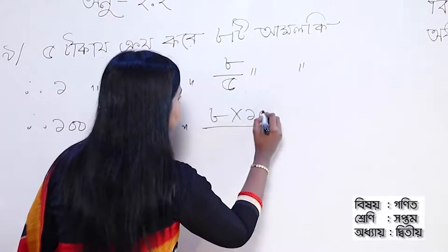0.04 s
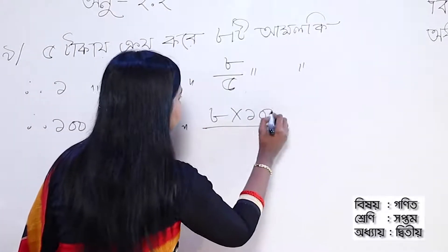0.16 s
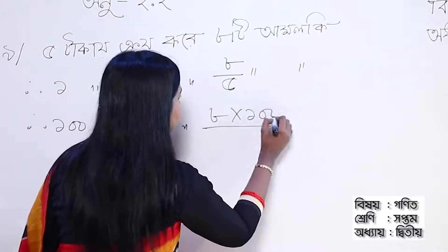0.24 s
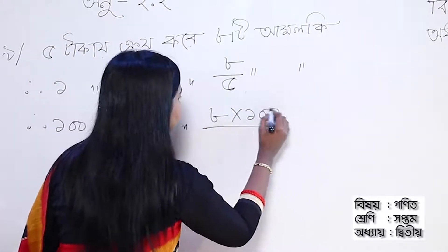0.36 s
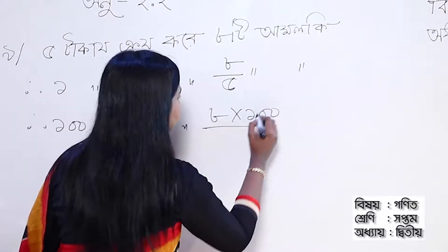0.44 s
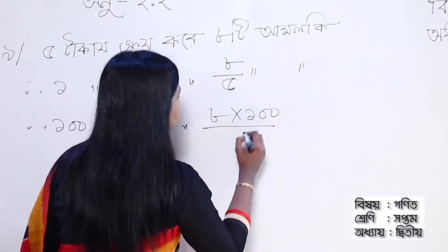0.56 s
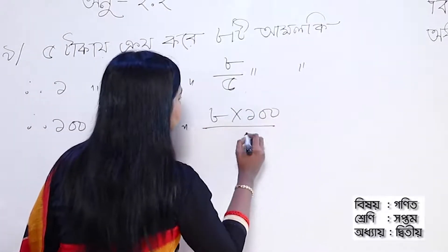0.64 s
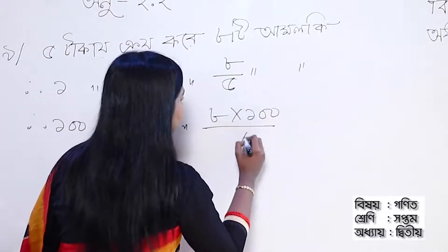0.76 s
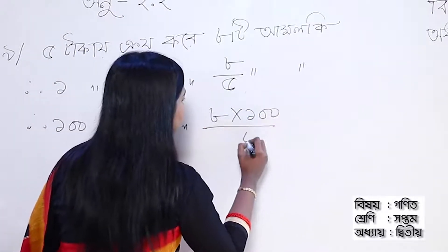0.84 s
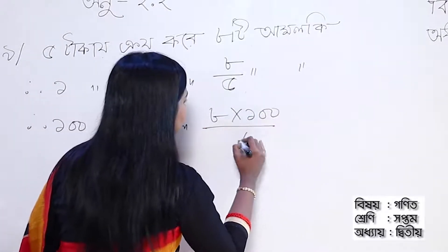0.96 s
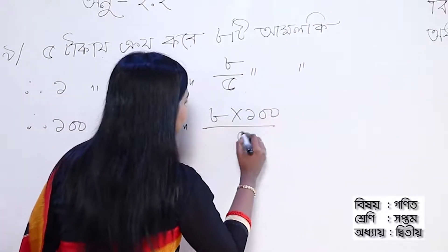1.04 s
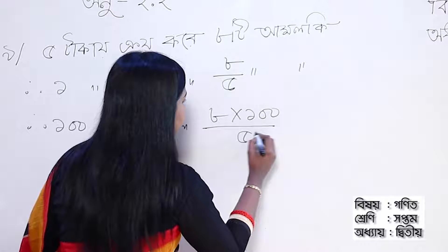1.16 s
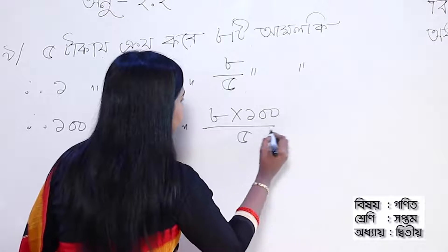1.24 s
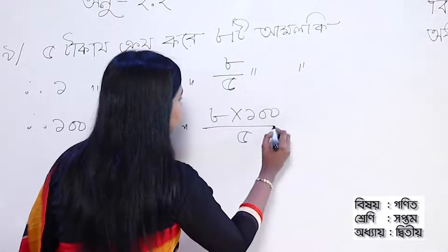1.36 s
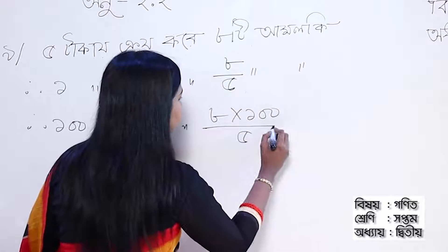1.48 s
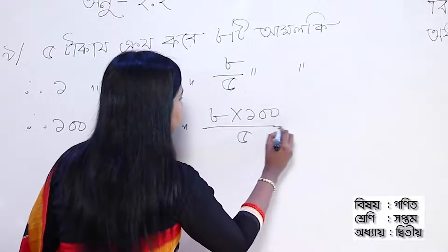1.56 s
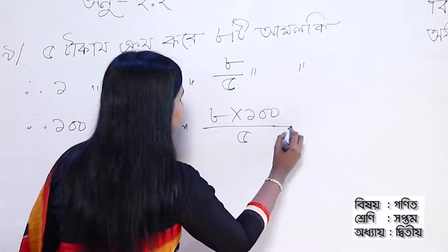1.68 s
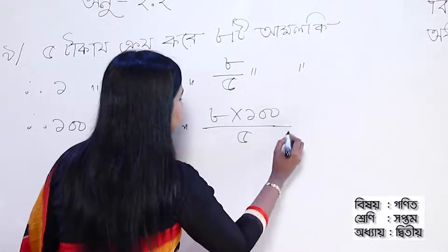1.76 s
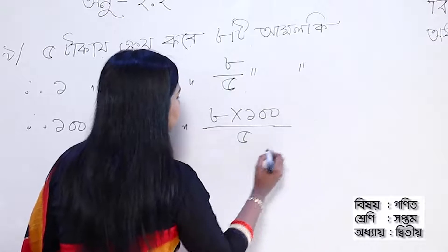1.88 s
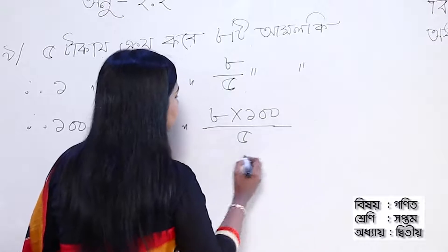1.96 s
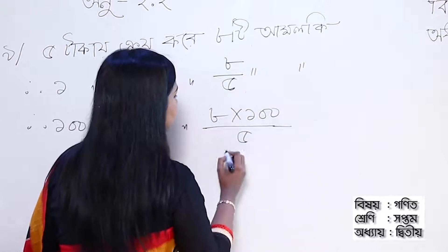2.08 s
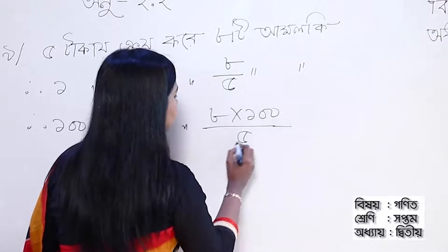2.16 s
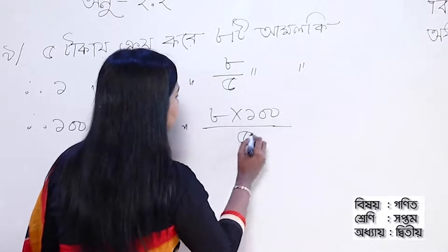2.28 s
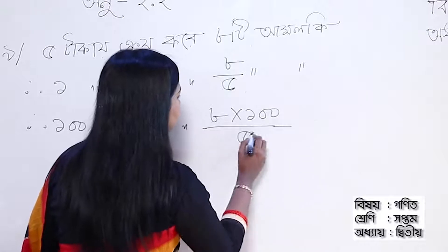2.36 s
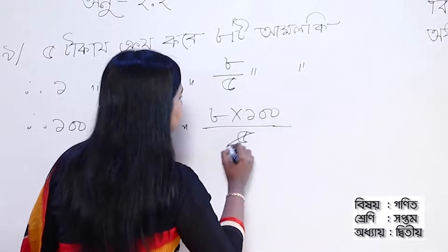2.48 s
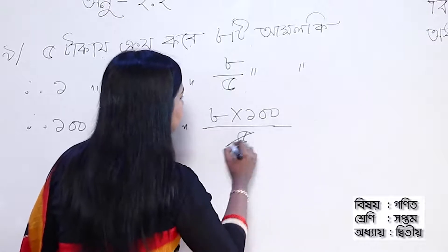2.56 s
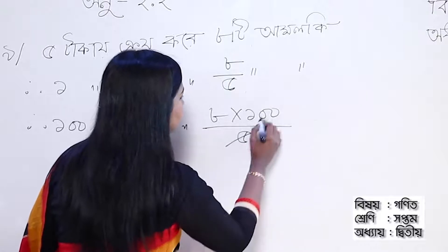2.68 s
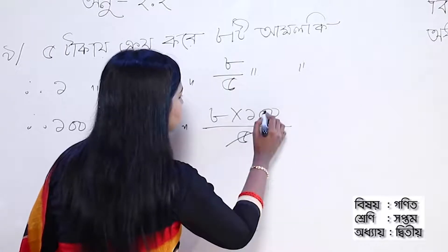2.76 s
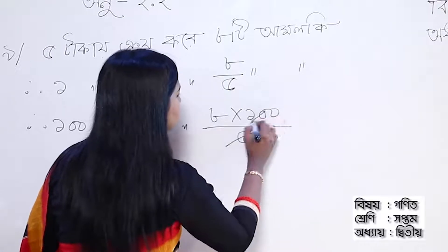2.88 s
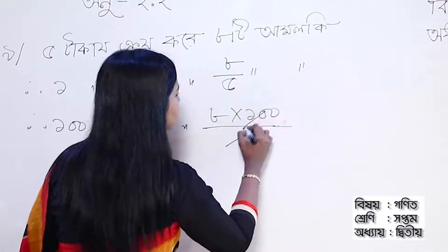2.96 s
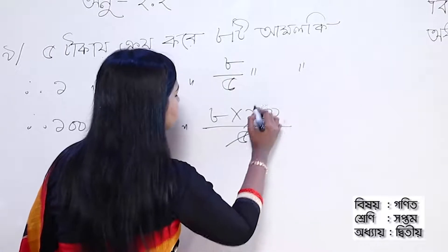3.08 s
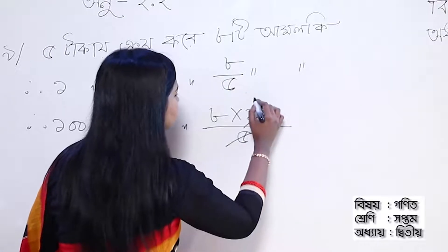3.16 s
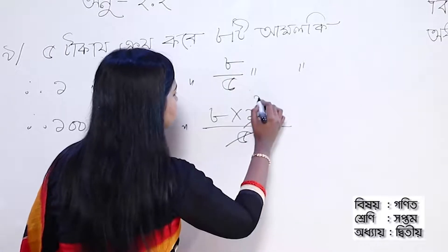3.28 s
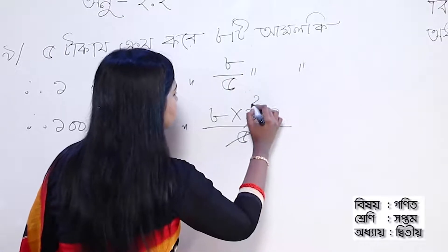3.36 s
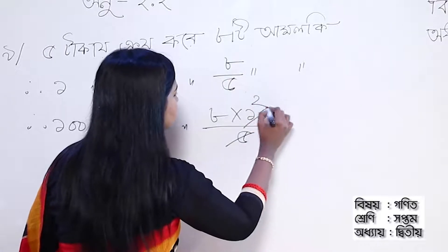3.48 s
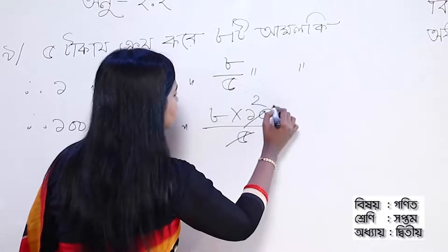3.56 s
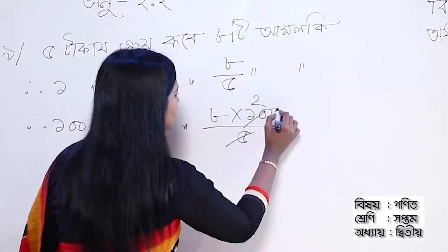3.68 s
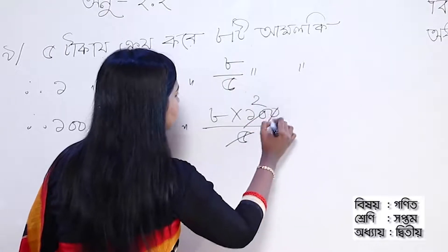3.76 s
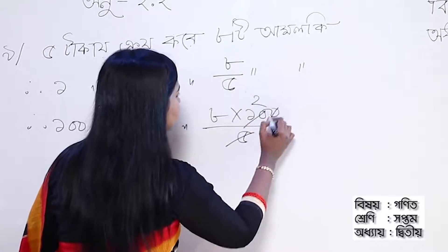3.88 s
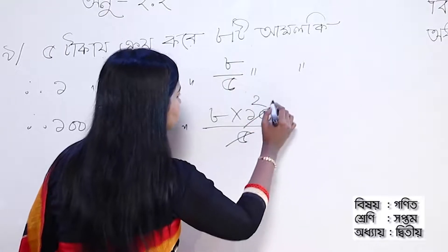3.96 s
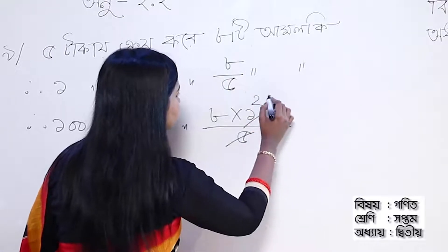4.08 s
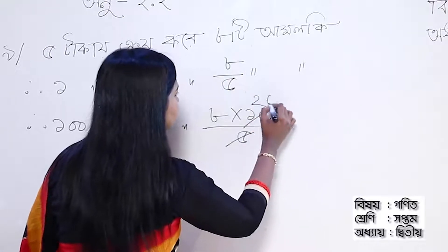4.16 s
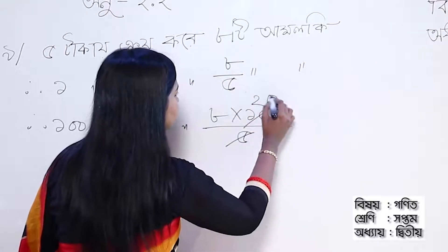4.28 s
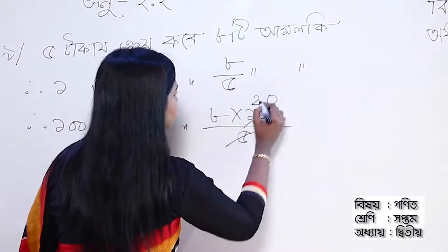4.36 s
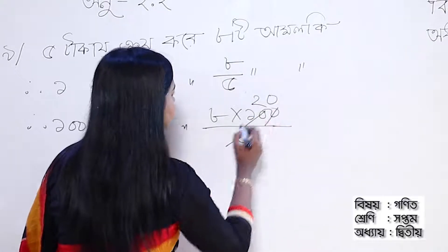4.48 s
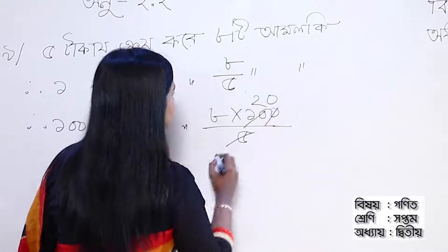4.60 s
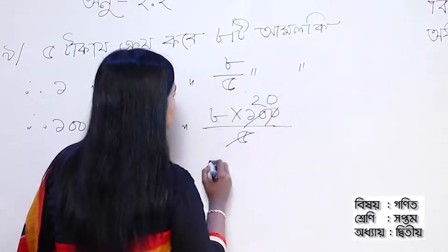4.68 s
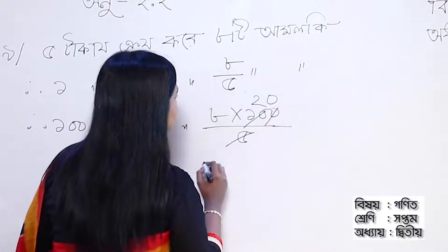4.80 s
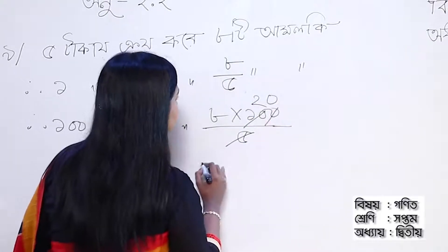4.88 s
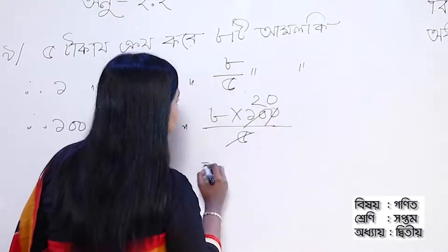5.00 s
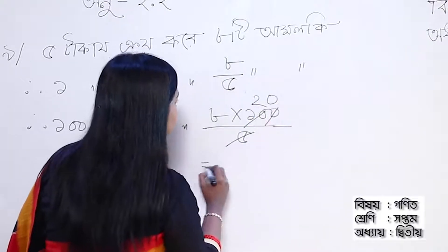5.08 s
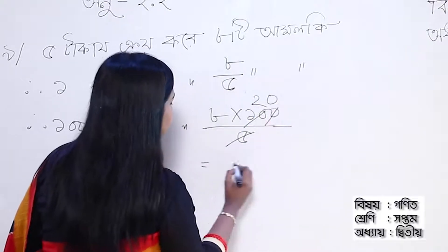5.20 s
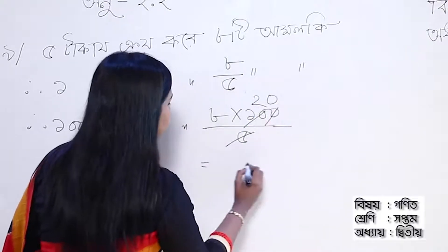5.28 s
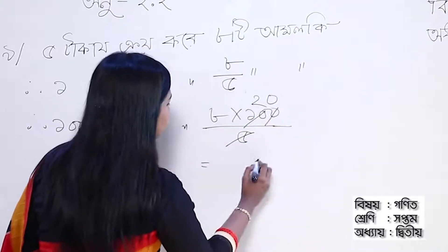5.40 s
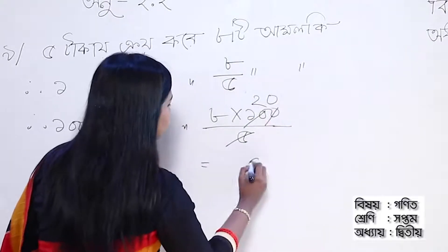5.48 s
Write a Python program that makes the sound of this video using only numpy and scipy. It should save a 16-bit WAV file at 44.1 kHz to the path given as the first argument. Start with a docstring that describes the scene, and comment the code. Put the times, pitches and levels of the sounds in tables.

```python
"""A treble hiss already under way: a felt marker in mid-stroke on a wall-mounted whiteboard still ringing.
Strokes are gritty noise through nib and board resonances; each landing thumps the board like a dull drum
by a falling, fast-dying wave, a click and ringing modes. Cloth noise is the writer's sleeve; short cycles
and snaps are dry ticks. Quiet classroom, near mono microphone, room rumble, microphone hiss, two whines."""
import sys
import numpy as np
from scipy import signal
from scipy.io import wavfile
from scipy.ndimage import uniform_filter1d

SR = 44100
rng = np.random.default_rng(int(sys.argv[2]) if len(sys.argv) > 2 else 0)


def inscribe(sig):
    """Save sig as 16-bit PCM at rate SR to the path in sys.argv[1].

    A 1-D sig is mono; a 2-D sig holds one channel per row.
    Samples are clipped to [-1, 1] before scaling.
    """
    pcm = np.round(np.clip(np.atleast_2d(sig).T, -1, 1) * 32767)
    wavfile.write(sys.argv[1], SR, pcm.astype(np.int16))


def ratio(d):
    """dB to gain"""
    e = np.asarray(d, float) / 20
    return 10 ** e


N = 244089
LEAD = SR // 20  # samples rendered ahead, so that an earlier blow still rings

# pulls of the nib: start t/s, length/s, share of length at which speed tops, scrape level/dB,
# lift of the nib's lowest ring/dB, lift of the airy top/dB
STROKES = [(-.04, 0.23, 0.67, -49, 2, -2), (0.153, 0.38, 0.17, -50.5, 2, -5),
           (.355, 0.14, .4, -44.5, .1, -2), (0.778, 0.045, .25, -61, .1, -1), (.855, 0.14, 0.53, -52, 3, 1),
           (1.01, 0.26, 0.18, -46.5, 5.5, -1), (1.15, 0.1, 0.63, -58, 9, .1), (1.639, .14, 0.67, -47, 4, 3),
           (2.465, .19, .6, -52, 7, 5), (2.677, 0.021, .4, -49, -1, -4),
           (2.862, 0.029, 0.51, -52, 4.5, -15), (2.921, .18, 0.7, -53, 7, 1),
           (3.296, 0.036, .3, -56.5, 5, -3), (3.335, 0.097, 0.72, -56.5, 5, -6),
           (3.419, 0.082, .7, -54.5, 10, -12), (3.517, 0.094, 0.46, -48, 7, 1), (3.786, .16, 1, -50, 2, 3),
           (4.155, .035, .35, -53.5, .1, -13), (4.222, 0.2, 0.73, -47, 5, 0), (5.003, 0.074, .7, -54, 5, 7),
           (5.163, 0.065, 0.65, -56, 6, 4)]
# broad nib resonances: f/Hz, width/Hz, relative level/dB
NIB_MODES = [(6660, 1230, -3), (8000, 1240, 1.5), (9200, 1740, 6), (10460, 2100, 6.5), (12050, 1900, 2),
             (14300, 2400, -3.5)]
# broad board resonances under the scrape: f/Hz, width/Hz, relative level/dB
BUZZ_MODES = [(890, 550, 0.5), (1780, 380, 1), (2870, 660, -1.5), (4350, 660, -8)]
# landings on the board: t/s, blow level before the felt low-pass/dB, nominal thump f/Hz,
# hard-tip click level relative to the thump/dB
TAPS = [(-.021, -18.5, 258, -24), (0.76, -23, 223, -13), (0.783, -11, 259, -53), (1.592, -15.5, 267, -27.5),
        (2.1076, -32, 250, -13.5), (2.2185, -32.5, 250, -19), (2.2283, -32, 251, -17),
        (2.4381, -13.5, 246, -35), (2.867, -15.5, 277, -27), (3.304, -7, 305, -23),
        (3.7725, -8.5, 283, -23.5), (4.163, -9.5, 281, -25), (4.682, -32.5, 285, -29),
        (4.889, -28, 227, -15), (4.9633, -12, 232, -37), (5.1687, -5.5, 259, -28.5),
        (5.427, -33.5, 204, -8), (5.5244, -16.5, 244, -24)]
# rings of the hard tip: f/Hz, relative level/dB, t60/s
TIP_MODES = [(416.6, 9, 0.042), (592, -2, 0.078), (1020, 3.5, 0.02), (1120, -23, 0.025), (1685, -7, .015)]
# board modes after a blow: f/Hz, relative level/dB, t60/s, gain on the stiffer, higher-pitched part/dB
BOARD_MODES = [(34.6, -5, 1, 6), (64, -19, 0.23, -13), (110.5, -1, 0.47, 11), (147.4, -1, 0.67, 8),
               (192.7, -3.5, 0.45, -4), (243.8, -4, 0.22, 10), (297, 2, 0.53, 0.5), (379, -11, 0.78, 0),
               (380, -34, 0.43, -37), (461.4, -10.5, 0.12, 25), (590, -8, 0.22, 8)]
# arm movements: start t/s, length/s, share of length at which speed tops, 1.5-6.5 kHz level/dB
ARM_MOVES = [(-.02, .3, 0.32, -58.5), (.33, 0.16, 0.81, -59.5), (.59, 0.19, 0.47, -60),
             (1.37, 0.072, 0.46, -59.5), (1.93, 0.5, 0.26, -56.5), (2.71, 0.22, 0.58, -57),
             (3.1, 0.3, 0.42, -58), (4.01, 0.22, 0.45, -57.5), (4.44, 0.55, 0.4, -53.5),
             (5.23, 0.46, 0.17, -61)]
# broad cloth resonances: f/Hz, width/Hz, relative level/dB
CLOTH_MODES = [(310, 240, 19.5), (880, 1000, 8), (3010, 2600, 4.5), (5720, 1450, 3.5), (10700, 7000, -2.5)]
# rumble and hiss spectrum: f/Hz, relative level per Hz/dB
FLOOR_SPECTRUM = [(15, -53), (25, -12.5), (64, 4), (96, 2.5), (276, -9.5), (637, -21), (905, -21.5),
                  (2150, -27.5), (3680, -29.5), (3990, -31), (4950, -31.5), (10500, -31), (15800, -33)]
# steady electrical tones: f/Hz, rms level/dB
WHINES = [(3908, -75), (4710, -80.5)]
# nib catches or lifts: t/s, tone level/dB, f/Hz, wide-band snap peak level/dB
TICKS = [(0.761, -50, 10200, -35), (0.869, -45, 895, -41), (.874, -45, 1710, -55), (0.947, -38, 9320, -44),
         (1.122, -45, 8000, -30), (1.177, -47, 11300, -30), (1.8225, -48, 9050, -45),
         (2.04, -50, 4480, -50), (2.1074, -58, 3480, -46), (2.2195, -39.5, 800, -46),
         (2.39, -50, 3940, -48), (2.4383, -45, 9300, -38), (2.6818, -50, 3220, -40),
         (2.8383, -44, 1810, -44), (3.1737, -53, 10800, -50), (3.772, -55, 8950, -40),
         (3.9769, -45, 11800, -29.5), (4.59, -49, 2850, -50), (4.684, -44, 3020, -53),
         (4.8895, -37.5, 780, -42), (5.3266, -50, 6260, -46)]
# wall and floor echoes: delay/s, gain before the low-pass
ECHOES = [(.0118, .14), (.0172, -.12), (.0261, -.24), (.0337, -.2), (.0493, .1), (.0568, .12), (.0653, .1),
          (.0733, .08)]
# diffuse tail: f/Hz, t60/s
TAIL_T60 = [(60, 1), (160, 1), (420, 0.54), (1100, 0.1), (8000, 0.17)]
# spectrum of the faint noise that differs between channels: f/Hz, relative level per Hz/dB
APART_SPECTRUM = [(30, -30), (150, -9), (300, -7), (600, -4.5), (2000, -5), (8000, -5.5), (11500, -9.5),
                  (13000, -15)]

SCRAPE_POWER, BUZZ_POWER, RUSTLE_POWER = 0.91, 1.3, 1.07  # amplitude grows as speed to this power
SCRAPE_ROUND, RUSTLE_ROUND = 1, 0.083  # 1 = round arch of speed, 0 = pointed peak
BUZZ_DB = -10.5  # relative to the scrape
LOW_DRIFT_DB, TOP_DRIFT_DB = 4, -3  # start to end of a pull: it darkens
THUMP_DECAY_CYCLES, FELT_HZ = 0.38, 1700  # decay constant; the felt cushions the blow above FELT_HZ
FLOOR_RMS_DB, APART_RMS_DB, TAIL_DB = -46, -75.5, -24
TICK_PEAK_S, TICK_SHORTER = 0.00079, 0.48  # peak time at 3 kHz; shortens with pitch to this power
EDGE_HZ = 15860


def evened(x):
    """Scales to rms 1."""
    return x / np.sqrt(np.mean(x ** 2) + 1e-20)


def read(points, hz):
    """Reads a curve on a log-frequency axis."""
    f, value = np.transpose(points)
    return np.interp(np.log(hz + 1), np.log(f + 1), value)


def add(mix, at_s, sound):
    """Adds a sound at a time."""
    part = mix[max(round(at_s * SR), 0):][:len(sound)]
    part += sound[:len(part)]


def humps(modes, hz):
    """Magnitude of broad resonances, added in energy."""
    power = sum(ratio(db) ** 2 / (1 + ((hz - f) / (width / 2)) ** 2) ** 2 for f, width, db in modes)
    return np.sqrt(power)


def rings(modes, t):
    """Sum of exponentially dying sines."""
    return sum(ratio(db - 60 * t / t60) * np.sin(2 * np.pi * hz * t) for hz, db, t60 in modes)


def gritty(grains_per_s, spread_db):
    """Slips of uneven size over smooth noise."""
    size = ratio(spread_db * np.minimum(rng.exponential(1, N), 4))
    size = size * (rng.random(N) < grains_per_s / SR)
    return evened(size * rng.standard_normal(N)) + rng.standard_normal(N)


def shaped(x, magnitude, patchy_db, size, bins, frames):
    """Filters x by magnitude(Hz, s) and by random streaks, bins high and frames long."""
    hz, t, z = signal.stft(x, SR, nperseg=size, noverlap=size * 3 // 4)
    patches = rng.standard_normal(z.T.shape).T
    patches = uniform_filter1d(patches, round(bins), 0)
    patches = evened(uniform_filter1d(patches, round(frames), 1))
    z = z * magnitude(hz[:, None], t) * ratio(patchy_db * patches)
    return signal.istft(z, SR, nperseg=size, noverlap=size * 3 // 4)[1][:N]


def moves(rows, t, power, rounded):
    """Progress 0-1 and gain of each movement: speed swells to its top and falls again."""
    start, length, share, db = np.transpose(rows)[:4, :, None]
    done = np.clip((t - start) / length, 0, 1)
    share = np.clip(share, .05, .95)
    ramp = np.minimum(done / share, (1 - done) / (1 - share))
    speed = ramp * (1 + np.clip(rounded, 0, 1) * (1 - ramp))
    return done, ratio(db) * speed ** power


def movement_gain(rows, power, rounded):
    """Gain of overlapping movements, added in energy."""
    return np.linalg.norm(moves(rows, np.arange(N) / SR, power, rounded)[1], axis=0)


def lift_db(t, drift_db, column):
    """Colour of the pull that sounds at t, drifting along it; overlaps weighted by energy."""
    done, gain = moves(STROKES, t, SCRAPE_POWER, SCRAPE_ROUND)
    db = np.transpose(STROKES)[column][:, None] + drift_db * (done - .5)
    return (gain ** 2 * db).sum(0) / ((gain ** 2).sum(0) + 1e-20)


def strokes():
    """Felt fibres slip over the glaze: they ring the nib, tilted by pressure and speed, and buzz the board."""
    judder = uniform_filter1d(rng.standard_normal(N), size=400)
    judder = evened(uniform_filter1d(judder, size=200))  # the grip wavers
    slips = gritty(grains_per_s=5500, spread_db=4.5) * ratio(1.3 * judder)

    def nib(hz, t):
        low = lift_db(t, LOW_DRIFT_DB, column=4) * np.clip((8500 - hz) / 1500, 0, 1)
        top = lift_db(t, TOP_DRIFT_DB, column=5) * np.clip((hz - 11000) / 2000, 0, 1)
        return humps(NIB_MODES, hz) * ratio(low + top)

    scrape = shaped(slips, nib, patchy_db=3.2, size=256, bins=3, frames=30)
    buzz = shaped(slips, lambda hz, t: humps(BUZZ_MODES, hz), patchy_db=3.0, size=256, bins=2, frames=20)
    scrape = movement_gain(STROKES, SCRAPE_POWER, SCRAPE_ROUND) * evened(scrape)
    buzz = movement_gain(STROKES, BUZZ_POWER, SCRAPE_ROUND) * evened(buzz)
    return scrape + ratio(BUZZ_DB) * buzz


def taps():
    """A soft nib drives a swelling, fast-dying bending wave that falls in pitch, a click, then board modes."""
    t, ring_t = np.arange(SR // 12) / SR, np.arange(SR * 3 // 5) / SR
    out = np.zeros(N + LEAD)
    click = rings(TIP_MODES, t) * (1 - np.exp(-t / 0.00062)) ** 2
    bank = np.array([rings([mode[:3]], ring_t) for mode in BOARD_MODES])
    bank = bank * ratio(-59.5) * (1 - np.exp(-ring_t / 0.021))
    stiff_gain_db = np.transpose(BOARD_MODES)[3]
    felt = signal.butter(2, FELT_HZ, fs=SR)
    for s, db, hz, click_db in TAPS:
        cycles = hz * t
        swell = cycles ** 1.95 * np.exp(-cycles / THUMP_DECAY_CYCLES)
        thump = -swell * np.sin(2 * np.pi * cycles ** .825)  # power below 1: pitch falls
        blow = ratio(db) * (thump / abs(thump).max() - ratio(click_db) * click)
        blow = signal.lfilter(*felt, blow)
        stiff = np.clip((hz - 250) / 40, 0, 1)
        add(out, s + LEAD / SR, blow)
        add(out, s + LEAD / SR, signal.fftconvolve(blow, ratio(stiff * stiff_gain_db) @ bank))
    return out


def sleeve():
    """Soft cloth noise that swells with the arm's speed."""
    cloth = gritty(grains_per_s=1700, spread_db=6.0)
    cloth = shaped(cloth, lambda hz, t: humps(CLOTH_MODES, hz), patchy_db=2, size=512, bins=6, frames=10)
    mids = signal.lfilter(*signal.butter(2, [1500, 6500], "band", fs=SR), cloth)
    return movement_gain(ARM_MOVES, RUSTLE_POWER, RUSTLE_ROUND) * cloth / mids.std()


def floor():
    """Low room rumble and microphone hiss as shaped noise, two thin whines as sines."""
    noise = shaped(rng.standard_normal(N), lambda hz, t: ratio(read(FLOOR_SPECTRUM, hz)),
                   patchy_db=1.7, size=2048, bins=5, frames=9)
    t = np.arange(N) / SR
    whines = sum(np.sqrt(2) * ratio(db) * np.sin(2 * np.pi * hz * t) for hz, db in WHINES)
    return ratio(FLOOR_RMS_DB) * evened(noise) + whines


def ticks():
    """Each tick is a short gritty snap and a few softly started cycles at its own pitch."""
    t, out = np.arange(2000) / SR, np.zeros(N)
    swell = t[:400] * np.exp(-t[:400] / 0.0012)
    grits = rng.standard_normal((len(TICKS), 400))
    for (s, db, hz, snap_db), grit in zip(TICKS, grits):
        peak_s = TICK_PEAK_S * (3000 / hz) ** TICK_SHORTER
        envelope = t / peak_s * np.exp(1 - t / peak_s)
        add(out, s, ratio(db) * envelope * np.sin(2 * np.pi * hz * t))
        snap = signal.lfilter([1, -.6], [1], grit * swell)
        add(out, s, ratio(snap_db) * snap / abs(snap).max())
    return out


def room(x):
    """Single echoes and a diffuse tail that mostly dies faster in the treble."""
    echoes = np.zeros(SR)
    for delay_s, gain in ECHOES:
        echoes[round(delay_s * SR)] += gain
    echoes = signal.lfilter(*signal.butter(1, 900, fs=SR), echoes)  # the walls return mostly bass
    sparse = np.zeros(SR)
    at = np.arange(SR // 50, SR - 20, 20)
    sparse[at + rng.integers(0, 20, len(at))] = rng.choice([-1., 1.], len(at))
    hz, s, z = signal.stft(sparse, SR, nperseg=1024)
    decay = ratio(-60 * s / read(TAIL_T60, hz)[:, None])
    tail = signal.istft(z * decay, SR, nperseg=1024)[1][:SR]
    tail *= ratio(TAIL_DB) / np.linalg.norm(tail)
    return x + signal.fftconvolve(x, echoes + tail)[:len(x)]


def scene():
    """One microphone feeds both channels."""
    near = taps()
    add(near, LEAD / SR, ticks() + strokes() + sleeve())
    mono = room(near)[LEAD:] + floor()
    return np.array([mono, mono])


def low_pass(x):
    """Removes everything above the highest recorded frequency."""
    return signal.sosfilt(signal.butter(12, 16530, fs=SR, output="sos"), x)


def record(dry):
    """Adds a faint, patchy noise of opposite sign in the two channels, then limits the band."""
    side = shaped(rng.standard_normal(N), lambda hz, t: ratio(read(APART_SPECTRUM, hz)),
                  patchy_db=5.5, size=2048, bins=174, frames=6)
    apart = dry + ratio(APART_RMS_DB) * evened(side) * [[1], [-1]]
    edge = signal.firwin(801, EDGE_HZ, window=("kaiser", 9), fs=SR)
    mix = signal.oaconvolve(apart, edge[None], "same")
    return low_pass(mix)


dry = scene()
out = record(dry)
inscribe(out)
```